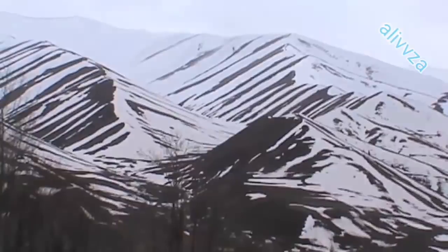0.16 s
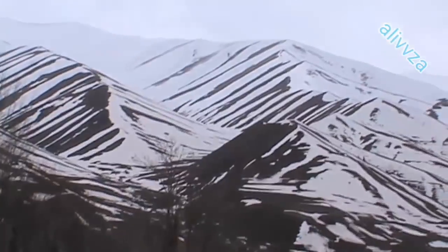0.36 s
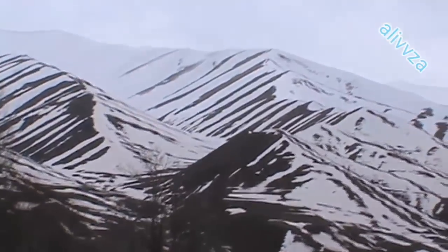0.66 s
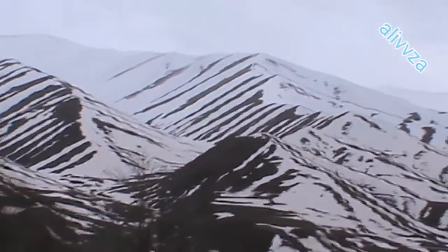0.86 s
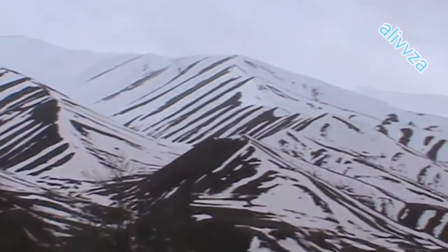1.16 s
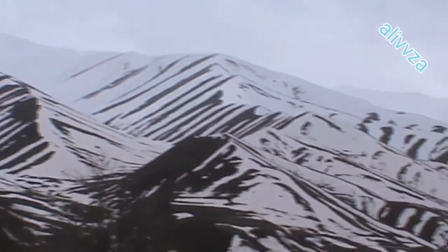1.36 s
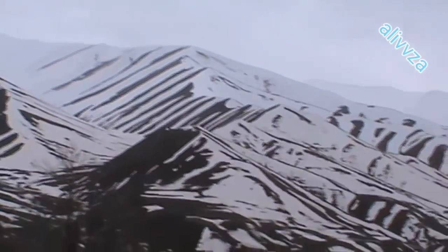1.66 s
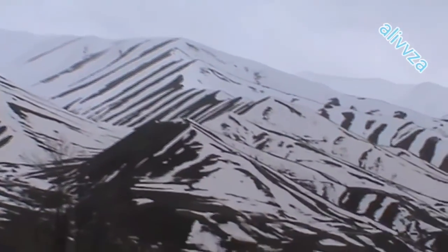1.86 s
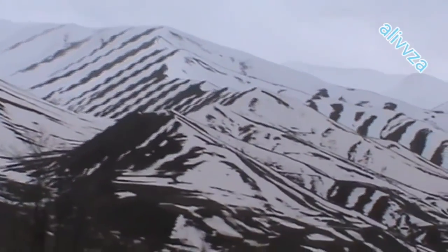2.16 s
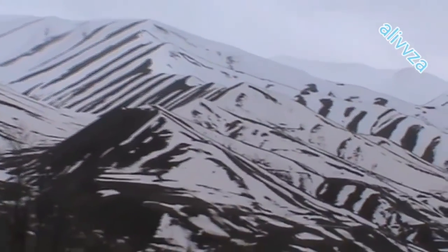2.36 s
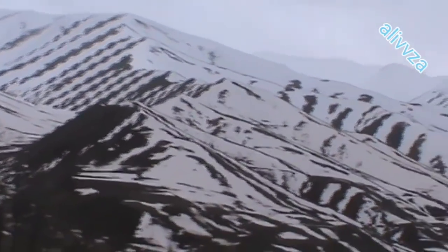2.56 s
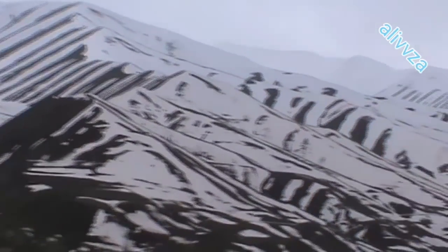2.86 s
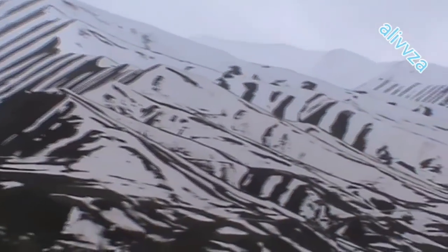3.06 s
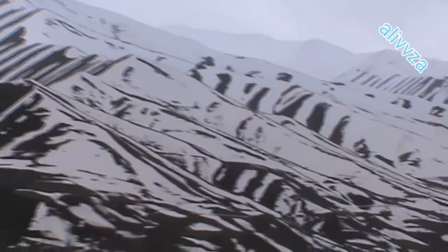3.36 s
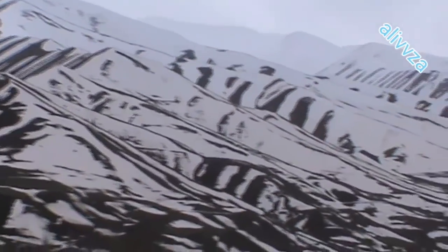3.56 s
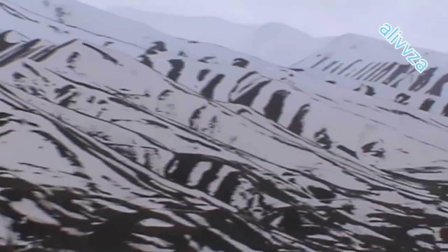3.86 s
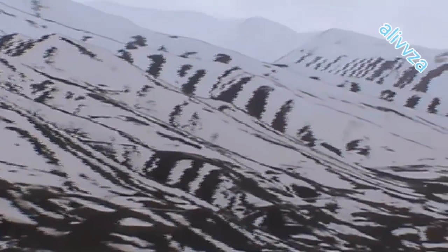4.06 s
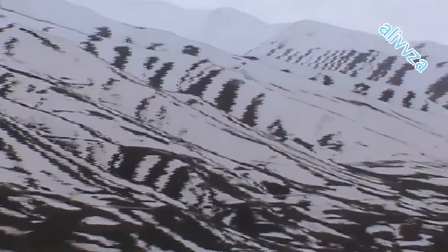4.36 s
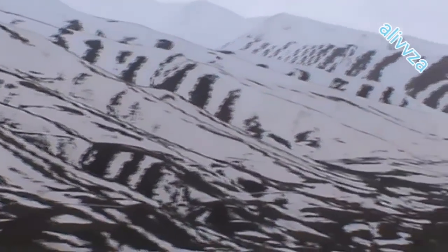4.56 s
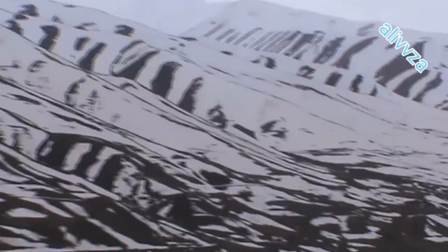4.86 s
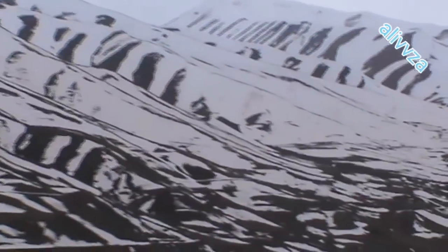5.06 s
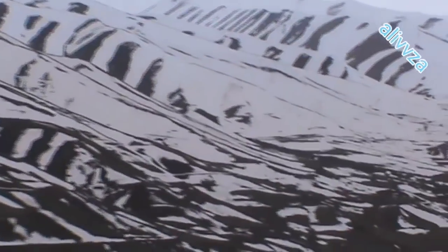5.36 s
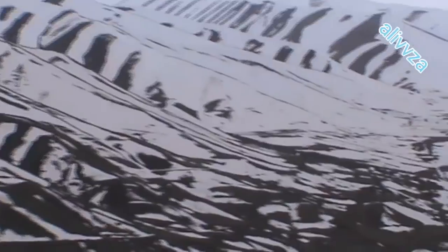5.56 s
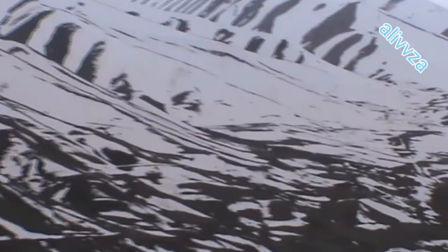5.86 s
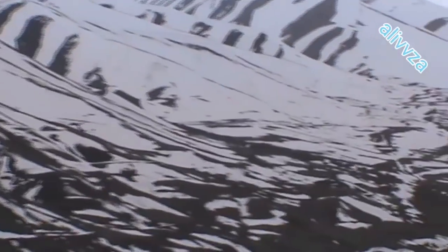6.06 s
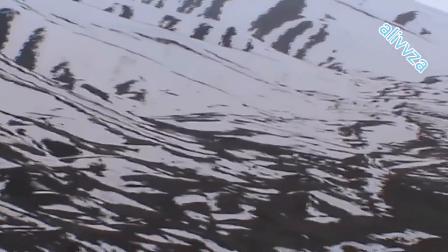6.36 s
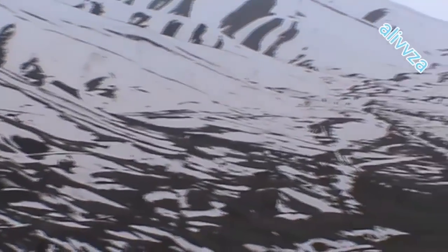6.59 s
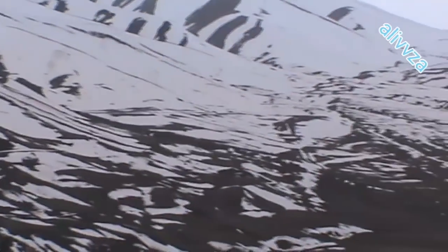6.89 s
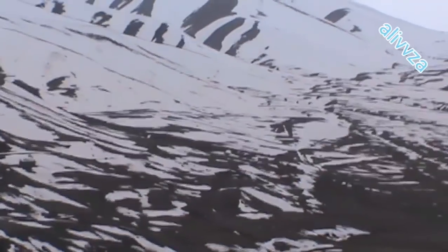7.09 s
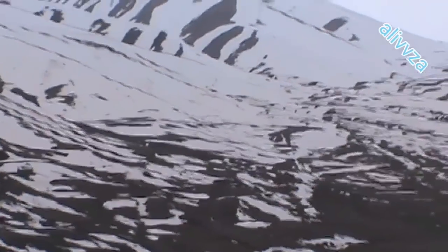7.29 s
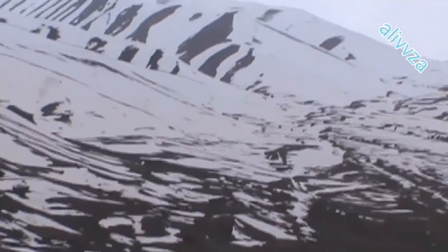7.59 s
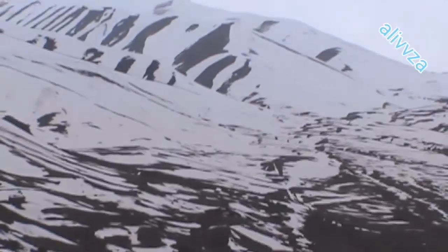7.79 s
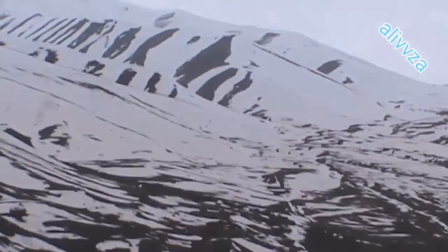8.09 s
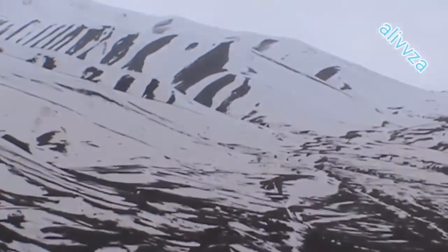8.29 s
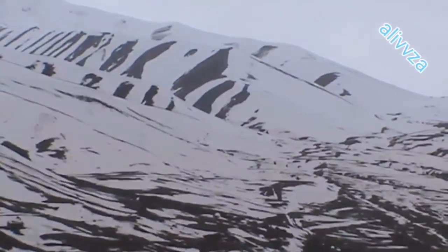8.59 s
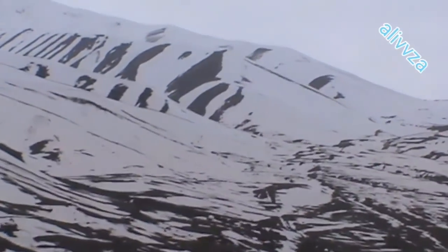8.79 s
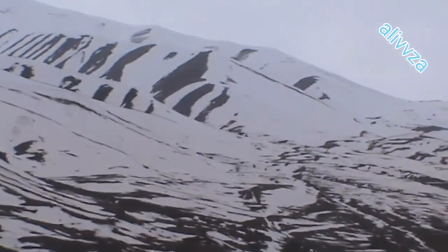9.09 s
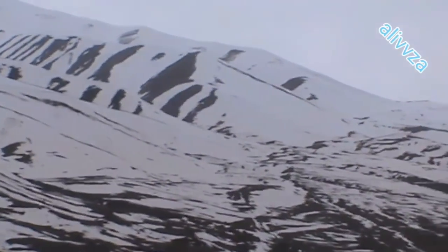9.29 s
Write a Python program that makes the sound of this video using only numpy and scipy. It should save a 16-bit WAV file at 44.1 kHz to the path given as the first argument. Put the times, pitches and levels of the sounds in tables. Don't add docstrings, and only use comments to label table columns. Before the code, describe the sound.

Two strong gusts of wind thump and flutter against a microphone on a snowy mountainside, with low uneven rumbling and faint hiss in the lull between.

```python
import sys
import numpy as np
from scipy import signal
from scipy.fft import rfft, irfft
from scipy.io import wavfile

SR = 44100
rng = np.random.default_rng(int(sys.argv[2]) if len(sys.argv) > 2 else 0)


def amplitude_ratio(level_db):
    exponent = np.asarray(level_db, float) / 20
    return 10 ** exponent


def int16_out(signal):
    q = np.round(np.clip(np.atleast_2d(signal).T, -1, 1) * 32767)
    wavfile.write(sys.argv[1], SR, q.astype(np.int16))


N = 416304

# centre_s, level_db, length_ms, snap_db (relative to the swirl)
GUST_EDDIES_FIRST = [(.128, -24, 50, -29), (.168, -26.5, 56, -30), (.226, -25.5, 33, -23),
                     (.35, -22, 20, -45), (.454, -26.5, 70, -20), (.622, -33, 30, -13),
                     (.702, -28, 13, -40), (.99, -33, 14, -20), (1.126, -27, 6.4, 6.5),
                     (1.169, -29, 74, 0.5), (1.191, -13.5, 9.7, -7), (1.24, -15, 14, -13),
                     (1.401, -18, 20.5, -4), (1.455, -28, 14, -10), (1.57, -24, 130, -22),
                     (1.615, -22, 9.5, -27), (7.105, -22.5, 25, -18.5), (7.255, -22.5, 20, -29),
                     (7.399, -14.5, 36, -24), (7.448, -11, 8, -12.5), (7.456, -27.5, 11, -28),
                     (7.48, -25, 35, -19), (7.614, -13, 6.7, -3), (7.855, -21, 37, -18.5),
                     (7.937, -12.5, 5.5, -17), (7.99, -28.5, 24, -24), (8.084, -15, 11, -47),
                     (8.683, -26.5, 34, -25), (8.728, -21.5, 52, -19.5), (8.8, -23, 7.6, -24)]
GUST_EDDIES_SECOND = [(.112, -27.5, 24, -13), (.234, -21, 16, -13.5), (.311, -24.5, 9, -28),
                      (.456, -18.5, 23, -8), (.562, -20.5, 16, -37), (.749, -24, 31, -7.5),
                      (.982, -21, 29, -17), (1.049, -25, 33, -11.5), (1.126, -13, 19, -13),
                      (1.22, -13, 24, -8), (1.25, -26, 29, -24), (1.279, -23.5, 13, -29),
                      (1.316, -22, 6, -28), (1.368, -15, 15, -17), (1.451, -18, 16, -7.5),
                      (1.526, -13.5, 15.6, -20.5), (1.659, -22.5, 29, -15), (7.398, -16.5, 43, -8.5),
                      (7.448, -33, 12, -12), (7.546, -25.5, 13, -10), (7.613, -16.5, 26, -4.5),
                      (7.662, -22, 13, -20), (7.71, -21, 8.9, -11), (7.808, -31.5, 33, -9),
                      (7.882, -21.5, 25, -13), (7.938, -17, 25, -23), (8.02, -25, 8.9, -33),
                      (8.711, -18, 17, -11), (8.746, -26.5, 41, -16), (8.782, -30.5, 21, -14)]
# centre_s, level_db, length_ms
PUFFS_FIRST = [(1.976, -26, 4.6), (2.185, -39.5, 28), (2.545, -24, 8), (2.66, -36.5, 18), (2.924, -30, 16),
               (2.998, -33, 20), (3.344, -33, 30), (3.76, -31.5, 40), (3.806, -21, 7.6), (4.037, -37, 45),
               (4.109, -36, 29), (4.178, -35.5, 38), (4.245, -36, 18), (4.49, -34, 27), (5.013, -39, 51),
               (5.279, -29, 31), (5.368, -38, 54), (5.665, -27.5, 11.5), (5.941, -32.5, 29),
               (6.017, -28.5, 40), (6.096, -34.5, 45), (6.222, -27.5, 11), (6.38, -43, 20),
               (6.557, -33, 35), (6.683, -30.5, 16), (7.743, -35, 24), (8.308, -34.5, 29),
               (8.38, -36.5, 70), (9.16, -27, 24), (9.323, -33, 12)]
PUFFS_SECOND = [(0.817, -33, 35), (1.575, -30, 40), (1.932, -31.5, 54), (2.387, -29, 15),
                (2.434, -37.5, 34), (2.5, -29.5, 19), (2.544, -19.5, 18), (2.803, -30.5, 7),
                (3.345, -34.5, 11), (3.466, -40.5, 39), (3.69, -34, 20), (4.192, -39.5, 14),
                (5.645, -35, 37), (5.738, -36.5, 36), (5.857, -37.5, 28), (6.209, -33.5, 24),
                (6.935, -32.5, 28), (7.008, -37, 28), (7.068, -32, 31), (8.063, -23, 9.4), (8.282, -34, 33),
                (8.442, -29.5, 20), (8.544, -33.5, 16), (9.003, -37, 39), (9.316, -29.5, 12)]
# centre_s, level_db, swirl_hz, length_ms, snap_db
CRACKS_FIRST = [
    (1.2028, -10.5, 159, 3.3, -14),
    (4.565, -17, 131, 17, -29),
    (4.576, -21.5, 122, 7, -10),
    (7.383, -21.5, 149, 16, -12),
    (7.462, -14, 109, 8.6, -20),
]
CRACKS_SECOND = [
    (0.473, -21, 220, 11, -4),
    (0.487, -28, 219, 14, -15),
    (.732, -26, 170, 10.4, -10),
    (0.961, -28.5, 200, 20, -16),
    (1.172, -32, 200, 12, -20),
    (2.025, -28, 125, 40, -11),
    (4.585, -26, 114, 87, -24),
    (7.601, -21.5, 201, 9.8, -9),
    (7.627, -27, 220, 12, -24),
]
# centre_s, peak_db, top_hz
SLAPS = [
    (1.1262, -21, 476),
    (1.221, -32, 430),
    (1.45, -36, 430),
    (2.03, -37, 300),
    (3.806, -36, 170),
    (4.576, -36, 230),
    (7.6138, -22.5, 440),
    (7.71, -38, 300),
    (7.937, -30, 260),
    (8.712, -35, 330),
]
# start_s, level_db, lean_db (towards the first port)
FLOW = [(0.0, -62, 2), (0.15, -40.5, -7.5), (0.29, -35.5, 2), (0.92, -47.5, -2), (1.29, -31, 0.5),
        (1.5, -35.5, -4), (1.68, -52, -4.5), (2.42, -54, -3.5), (2.81, -52.5, -1.5), (4.36, -54, 9.5),
        (4.89, -51.5, -4.5), (5.18, -47.5, 0), (5.49, -52.5, -2), (6.07, -49, -4), (6.39, -50.5, -8),
        (7.57, -33.5, 1.5), (9.1, -49, 1), (9.44, -50, -1.5)]
# pitch_hz, density_db (per Hz)
RUMBLE_SPECTRUM = [(8, -17), (18, -1.5), (35, -6), (60, -2.5), (110, -12.5), (220, -53)]
# pitch_hz, density_db (per Hz)
CHURN_SPECTRUM = [(30, -40), (60, 0.5), (110, -2.5), (200, -10), (400, -23), (800, -38), (1600, -67),
                  (4000, -100)]
# start_s, level_db
FAR_AIR_LEVEL = [(0.0, -59.5), (1.2, -59.5), (1.45, -58.5), (1.75, -59.5), (4.13, -63.5), (4.57, -61),
                 (6.85, -61), (7.9, -60.5), (8.4, -59), (8.8, -59.5), (9.44, -62.5)]
# pitch_hz, density_db (per Hz)
FAR_AIR_SPECTRUM = [(200, -4.5), (600, -10.5), (1500, -14), (3500, -17.5), (5000, -18), (14800, -17)]
# start_s, length_s, pitch_hz, level_db (rms)
WHISTLE_SPELLS = [
    (4.59, .11, 1595, -71),
    (4.81, .17, 1595, -70.5),
    (5.05, .2, 1620, -78),
    (5.66, .16, 1590, -76),
]
# pitch_hz, level_db (rms)
ZOOM_LINES = [(6401, -85), (6654, -74)]
# start_s, pitch_hz, peak_db, t60_s
ZOOM_TICK = (6.325, 5450, -49, .011)
# start_s, pitch_hz, level_db (rms)
CHIRP_GLIDE = [
    (7.562, 9150, -90),
    (7.57, 9090, -72),
    (7.58, 8930, -68),
    (7.59, 8760, -54),
    (7.6, 8420, -47.5),
    (7.606, 8150, -50),
    (7.612, 7750, -57),
    (7.618, 7150, -66),
    (7.623, 6700, -90),
]
# pitch_hz, density_db (per Hz)
HISS_SPECTRUM = [(200, -12), (400, -3.5), (1240, -10), (3500, -15), (4800, -12), (9000, -16.5),
                 (14800, -18)]
# pitch_hz, gain_db
DIFFERENCE_GAIN = [(20, -12), (56, -12), (160, -3.5), (450, 1.5), (900, 6), (2400, 4), (4350, 0.5),
                   (4750, -13.5)]

SWIRL_HZ, SOFT_SNAP_DB, SNAP_DB_PER_OCTAVE, SWIRL_SPREAD_OCTAVES = 93.5, -63.5, 66, 0.098
PUFF_SNAP_FIRST_DB, PUFF_SNAP_SECOND_DB = -34, -28.5
ROUGH_AIR_FROM_S, ROUGH_AIR_SNAP_DB = 7.4, 12
RUMBLE_DB, RUMBLE_FOLLOWS, CHURN_DB, CHURN_FOLLOWS = -47, 0.7, -50, 0.97
WHISTLE_EDGE_S, WHISTLE_THIRD_DB = 0.015, -13
ZOOM_ON_S, ZOOM_OFF_S = 1.99, 6.31
ZOOM_CATCH_HZ, ZOOM_CATCH_DB = 18.0, -8
ZOOM_LEAN_DB, BIRD_LEAN_DB = 6.5, 8
HISS_DB = -60.5
BAND_LIMIT_HZ = 15550


def rms_one(x):
    return x / np.sqrt(np.mean(x ** 2) + 1e-20)


def seconds():
    return np.arange(N) / SR


def in_time(rows):
    s, *columns = np.transpose(rows)
    return [np.interp(seconds(), s, column) for column in columns]


def at_hz(points, hz):
    point_hz, point_db = np.transpose(points)
    return np.interp(np.log(hz + 1), np.log(point_hz), point_db)


def bins(size):
    return np.arange(size // 2 + 1) * SR / size


def coloured(spectrum):
    white = rfft(rng.standard_normal(N))
    return rms_one(irfft(white * amplitude_ratio(at_hz(spectrum, bins(N))), N))


def drift(hz):
    step = 40
    settling = 2000
    r = np.exp(-2 * np.pi * hz * step / SR)
    noise = rng.standard_normal(N // step + settling + 2)
    slow = signal.lfilter([1], [1, -2 * r, r * r], noise)[settling:]
    return np.interp(np.arange(N) / step, np.arange(len(slow)), rms_one(slow))


def with_swirl(gust_rows, puff_rows, puff_snap_db):
    puffs = []
    for s, level_db, length_ms in puff_rows:
        rough = s > ROUGH_AIR_FROM_S
        puffs.append((s, level_db, length_ms, puff_snap_db + ROUGH_AIR_SNAP_DB * rough))
    s, level_db, length_ms, snap_db = np.transpose(gust_rows + puffs)
    octaves = (level_db + snap_db - SOFT_SNAP_DB) / SNAP_DB_PER_OCTAVE
    octaves = octaves + SWIRL_SPREAD_OCTAVES * rng.standard_normal(len(s))
    return list(zip(s, level_db, SWIRL_HZ * 2 ** octaves, length_ms, snap_db))


def burst(colour, length_s, noise, turn, pulse_share):
    size = len(noise)
    t = (np.arange(size) - size // 2) / SR
    stretch = np.where(t < 0, 0.85, 1.1)
    bell = np.hanning(size) * np.exp(-0.5 * (t / length_s / stretch) ** 2)
    centred = np.roll(irfft(colour * np.exp(1j * turn), size), size // 2)
    pulse = rms_one(bell * centred)
    swirl = rms_one(bell * irfft(colour * rfft(noise), size))
    return rms_one(pulse_share * pulse + swirl) * np.sqrt(np.mean(bell ** 2))


def eddies(table, size=8192):
    out = np.zeros(N + size)
    hz = bins(size) + 1e-3
    snap = hz / (1 + (260 / hz) ** 8) * np.exp(-(hz / 125) ** 0.87)
    for s, level_db, swirl_hz, length_ms, snap_db in table:
        noise = rng.standard_normal((2, size))
        turn = rng.uniform(0, 2 * np.pi)
        ratio = hz / swirl_hz
        resonance = np.abs(1 - ratio ** 2 + 1j * ratio / 0.83)
        swing = ratio ** 1.23 / resonance * np.exp(-ratio / 1.097)
        body = burst(swing, length_ms * 0.00049, noise[0], turn, pulse_share=0.58)
        edge = burst(snap, length_ms * 0.00039, noise[1], turn, pulse_share=1.0)
        at = round(s * SR)
        out[at:at + size] += amplitude_ratio(level_db) * (body + amplitude_ratio(snap_db - 4.0) * edge)
    return out[size // 2:size // 2 + N]


def slaps():
    hz = bins(N)
    total = np.zeros(N)
    for s, peak_db, top_hz in SLAPS:
        delay = np.exp(-2j * np.pi * hz * s)
        pulse = irfft(1j * hz * np.exp(-hz / top_hz) * delay, N)
        total += amplitude_ratio(peak_db) * pulse / np.abs(pulse).max()
    return total


def air_flow(rumble_db, churn_db):
    flutter = drift(hz=7.4)
    rumble = amplitude_ratio(rumble_db + 2.7 * flutter) * coloured(RUMBLE_SPECTRUM)
    churn_level_db = churn_db + 2.0 * flutter + 3.5 * drift(hz=11.0)
    return rumble + amplitude_ratio(churn_level_db) * coloured(CHURN_SPECTRUM)


def far_air():
    level_db = in_time(FAR_AIR_LEVEL)[0] + 1.0
    return amplitude_ratio(level_db) * coloured(FAR_AIR_SPECTRUM)


def whistle():
    t = seconds()
    out = np.zeros(N)
    for s, length_s, hz, level_db in WHISTLE_SPELLS:
        gate = np.clip(np.minimum(t - s, s + length_s - t) / WHISTLE_EDGE_S, 0, 1)
        phase = 2 * np.pi * hz * t
        tone = np.sin(phase) + amplitude_ratio(WHISTLE_THIRD_DB) * np.sin(3 * phase)
        out += np.sqrt(2) * amplitude_ratio(level_db) * gate * tone
    return out * amplitude_ratio(2.0 * drift(hz=30.0))


def zoom_motor():
    t = seconds()
    lines = np.zeros(N)
    for hz, level_db in ZOOM_LINES:
        catch = np.clip(2 * drift(ZOOM_CATCH_HZ) - 1, 0, 1)
        line_db = level_db + 1.5 + 2.5 * drift(hz=30.0) + ZOOM_CATCH_DB * catch
        wander = (hz - 6300) / 250 * drift(hz=16.0)
        lines += np.sqrt(2) * amplitude_ratio(line_db) * np.sin(2 * np.pi * hz * t + wander)
    running = (t > ZOOM_ON_S) * (t < ZOOM_OFF_S)
    s, hz, peak_db, t60_s = ZOOM_TICK
    after = np.maximum(t - s, 0)
    tick = np.sin(2 * np.pi * hz * after) + 0.6 * np.sin(2 * np.pi * 0.86 * hz * after)
    return lines * running + amplitude_ratio(peak_db - 60 * after / t60_s) * tick


def bird_chirp():
    hz, level_db = in_time(CHIRP_GLIDE)
    phase = 2 * np.pi * np.cumsum(hz) / SR
    sounding = level_db > -89
    return np.sqrt(2) * amplitude_ratio(level_db) * sounding * np.sin(phase)


def capsule_hiss():
    return amplitude_ratio(HISS_DB) * coloured(HISS_SPECTRUM)


def port(table, rumble_db, churn_db):
    return eddies(table) + air_flow(rumble_db, churn_db) + capsule_hiss()


def scene():
    flow_db, lean_db = in_time(FLOW)
    swing_db = flow_db - np.mean(np.array(FLOW)[:, 1])
    rumble_db = RUMBLE_DB + RUMBLE_FOLLOWS * swing_db
    churn_db = CHURN_DB + CHURN_FOLLOWS * swing_db
    first_eddies = with_swirl(GUST_EDDIES_FIRST, PUFFS_FIRST, PUFF_SNAP_FIRST_DB) + CRACKS_FIRST
    second_eddies = with_swirl(GUST_EDDIES_SECOND, PUFFS_SECOND, PUFF_SNAP_SECOND_DB) + CRACKS_SECOND
    first = port(first_eddies, rumble_db + lean_db, churn_db + lean_db)
    second = port(second_eddies, rumble_db - lean_db, churn_db - lean_db) + slaps()

    sides = np.array([[1], [-1]])
    both = (far_air() + whistle()) * amplitude_ratio(0.98 * drift(hz=13.0))
    motor = zoom_motor() * amplitude_ratio(ZOOM_LEAN_DB * sides - 1.0)
    bird = bird_chirp() * amplitude_ratio(BIRD_LEAN_DB * sides - 3.0)
    return np.array([first, second]) + both + motor + bird


def band_limit(x):
    return signal.sosfilt(signal.butter(12, 16240, fs=SR, output="sos"), x)


def record(dry):
    mid = (dry[0] + dry[1]) / 2
    difference = (dry[0] - dry[1]) / 2
    side = irfft(rfft(difference) * 1j * amplitude_ratio(at_hz(DIFFERENCE_GAIN, bins(N))), N)
    stereo = np.array([mid + side, mid - side])
    mix = irfft(rfft(stereo) * (bins(N) < BAND_LIMIT_HZ), N)
    return band_limit(mix)


dry = scene()
out = record(dry)
int16_out(out)
```